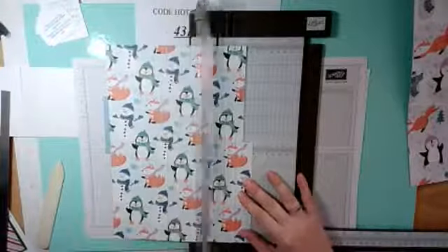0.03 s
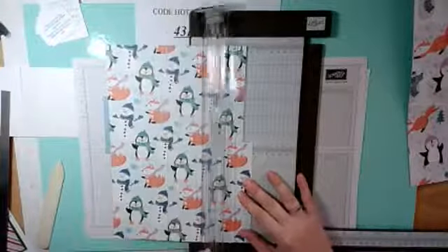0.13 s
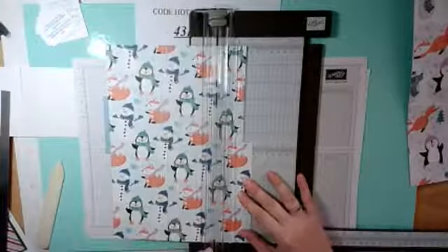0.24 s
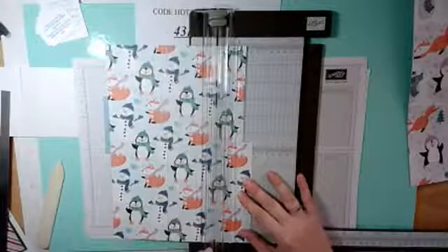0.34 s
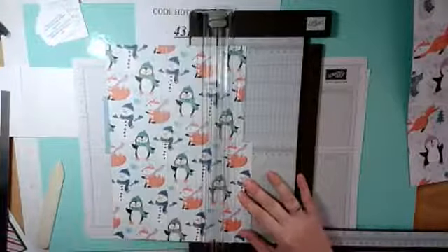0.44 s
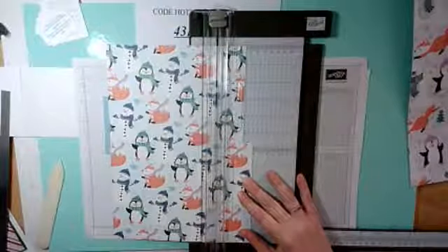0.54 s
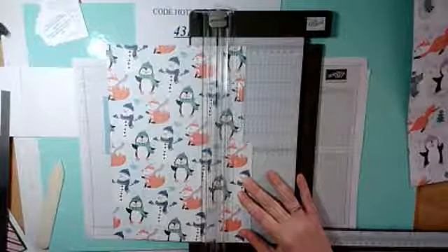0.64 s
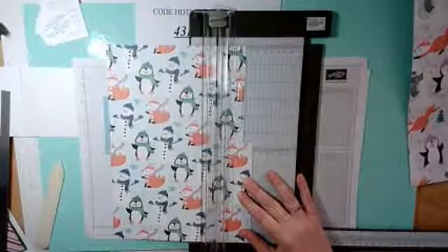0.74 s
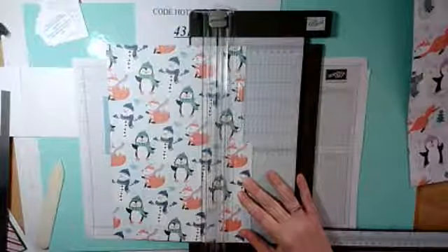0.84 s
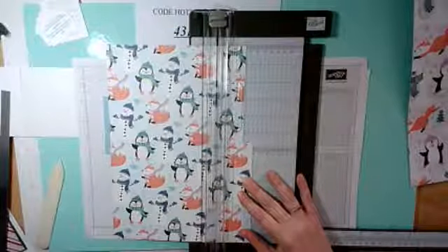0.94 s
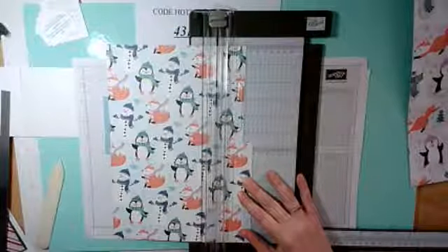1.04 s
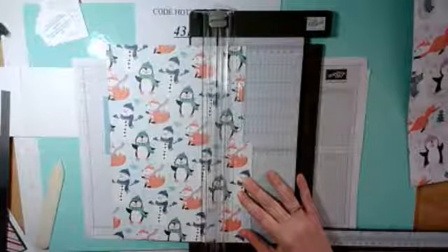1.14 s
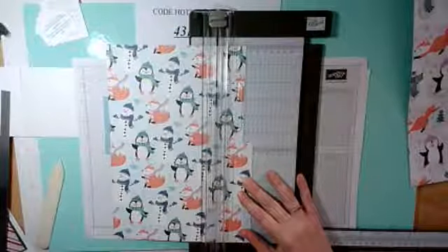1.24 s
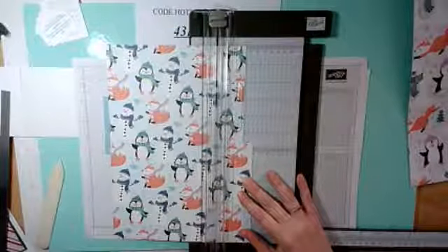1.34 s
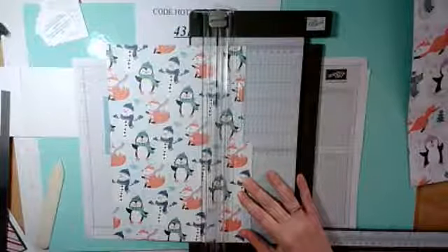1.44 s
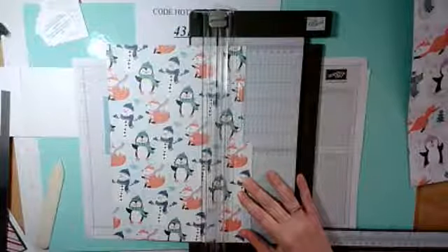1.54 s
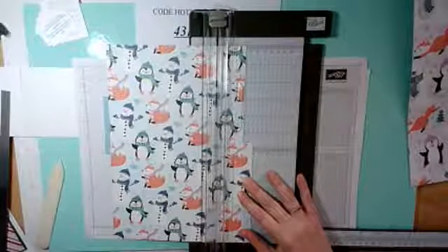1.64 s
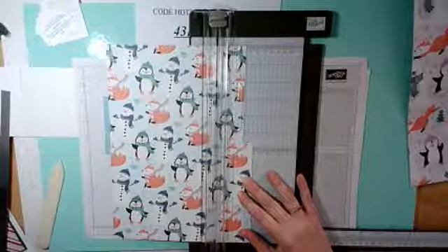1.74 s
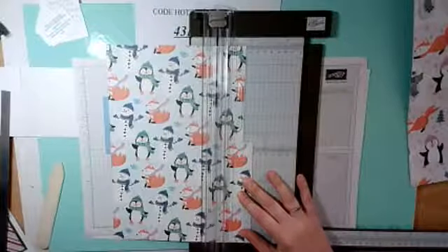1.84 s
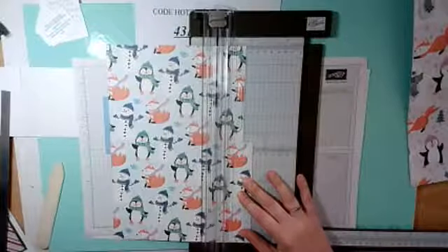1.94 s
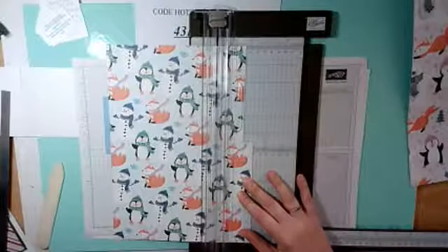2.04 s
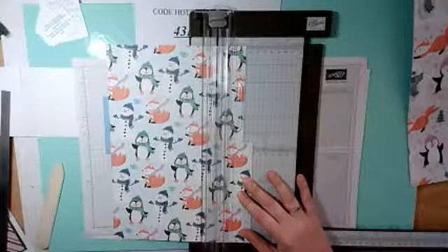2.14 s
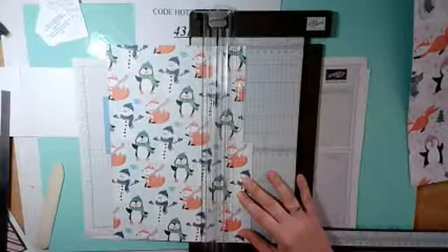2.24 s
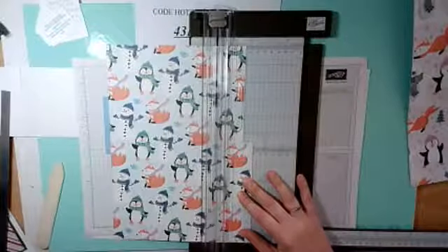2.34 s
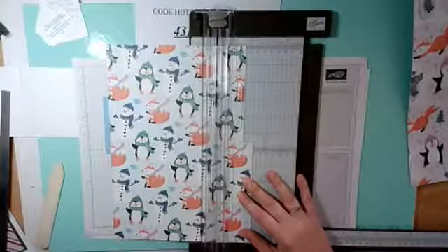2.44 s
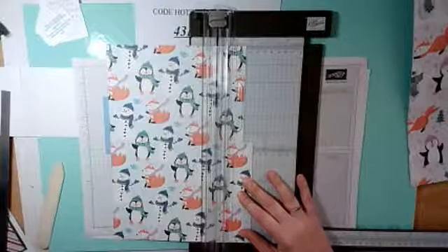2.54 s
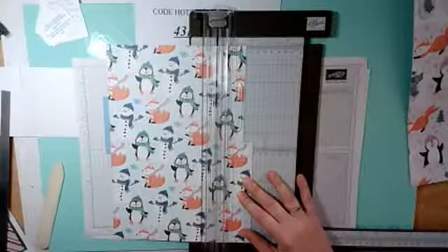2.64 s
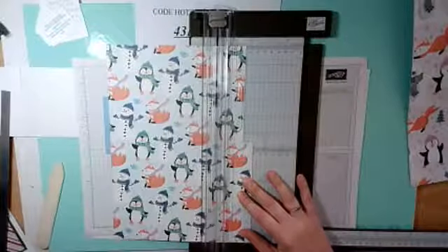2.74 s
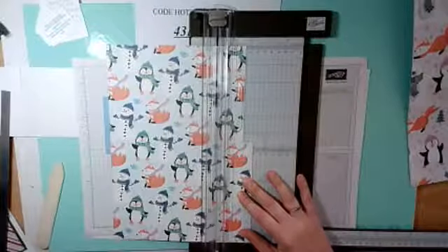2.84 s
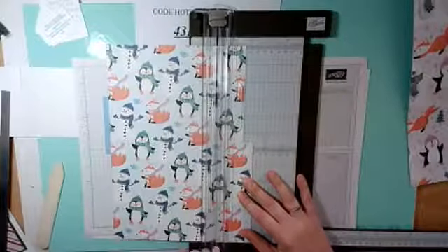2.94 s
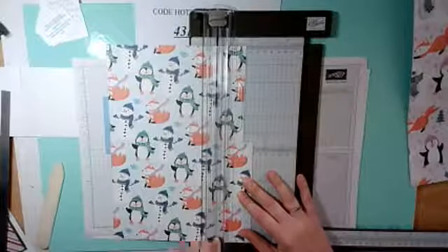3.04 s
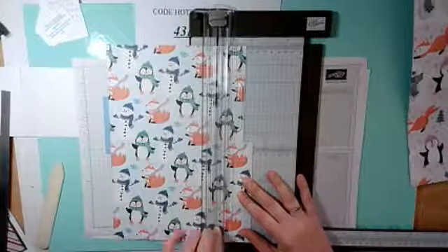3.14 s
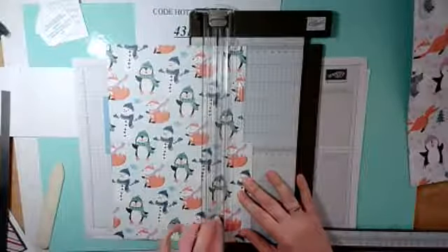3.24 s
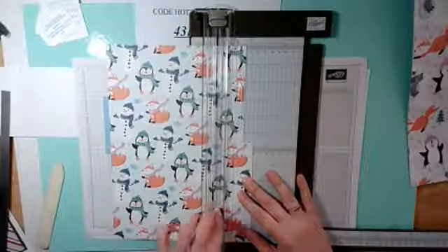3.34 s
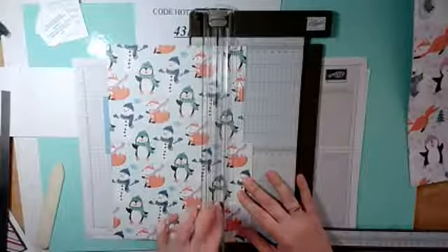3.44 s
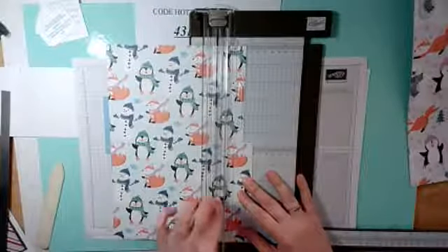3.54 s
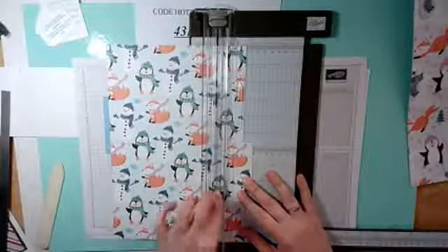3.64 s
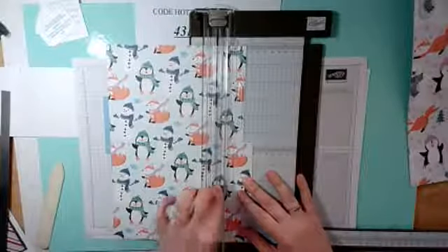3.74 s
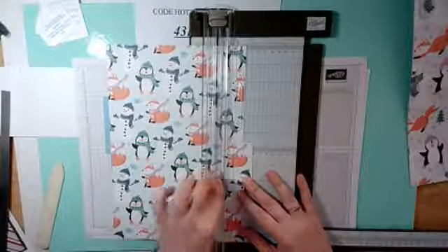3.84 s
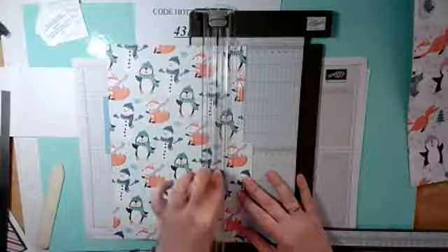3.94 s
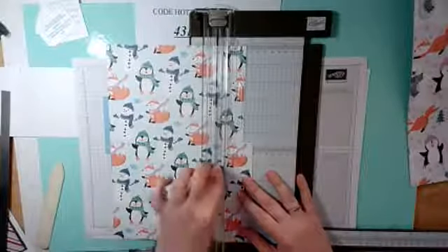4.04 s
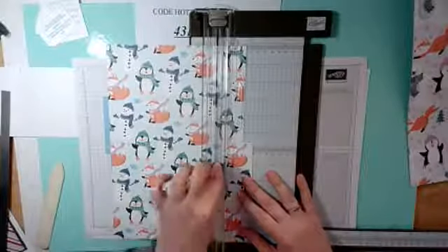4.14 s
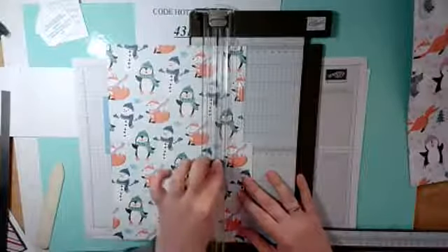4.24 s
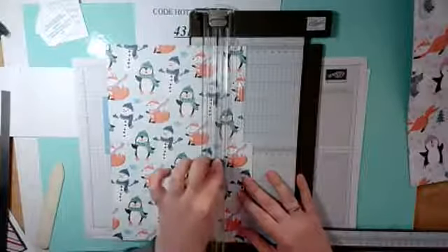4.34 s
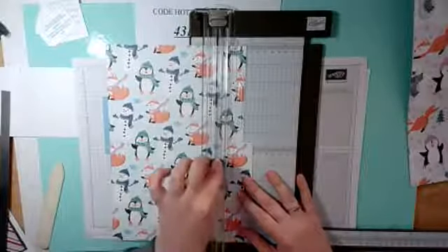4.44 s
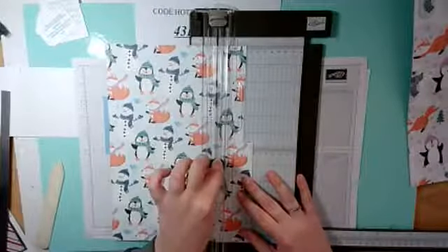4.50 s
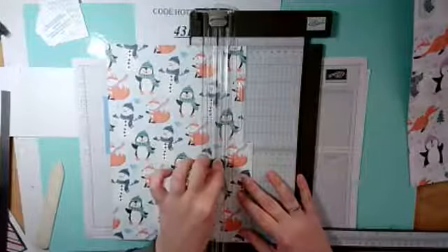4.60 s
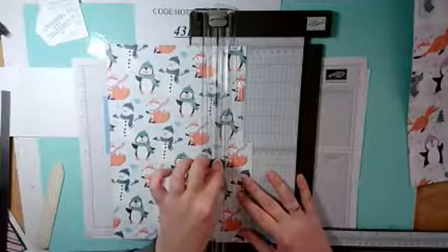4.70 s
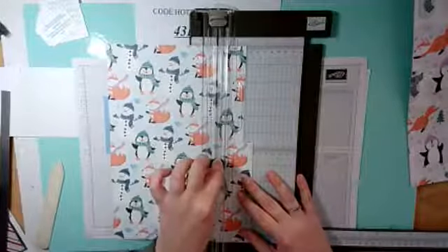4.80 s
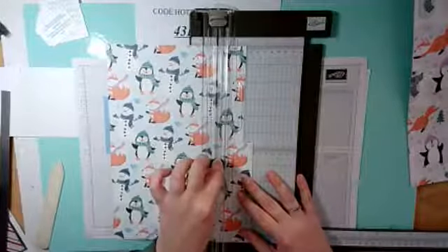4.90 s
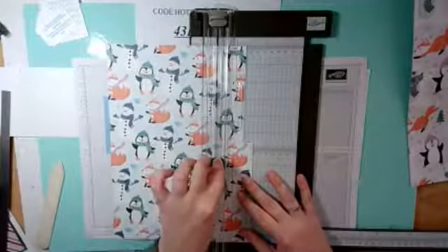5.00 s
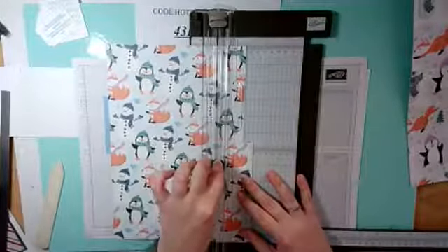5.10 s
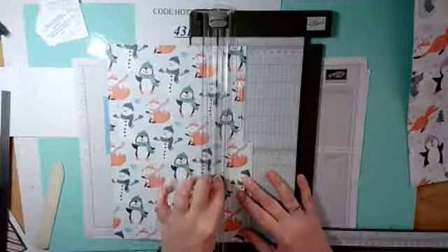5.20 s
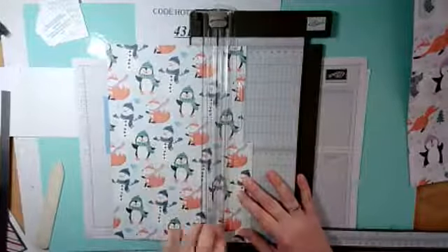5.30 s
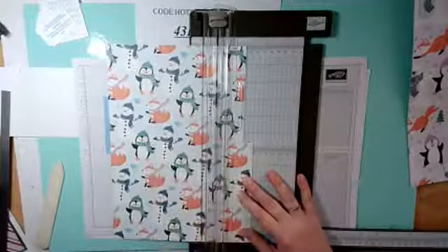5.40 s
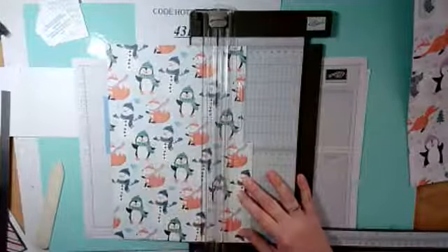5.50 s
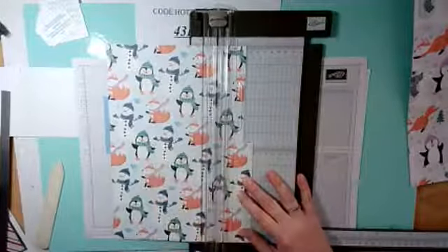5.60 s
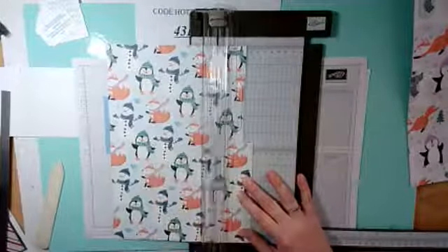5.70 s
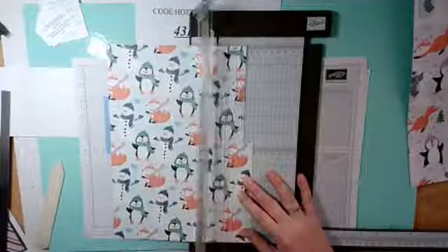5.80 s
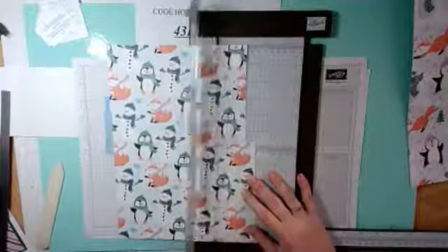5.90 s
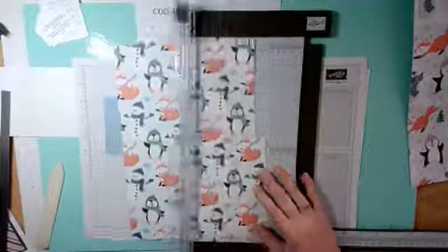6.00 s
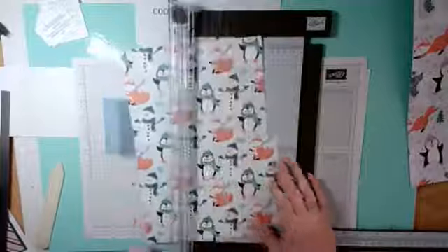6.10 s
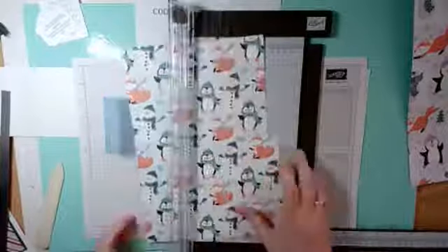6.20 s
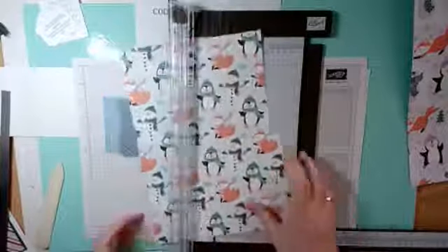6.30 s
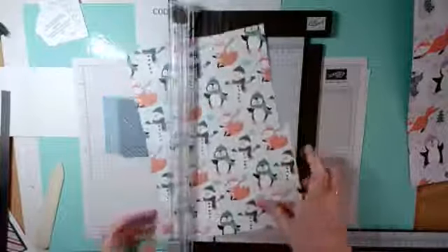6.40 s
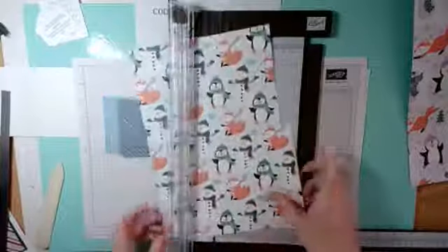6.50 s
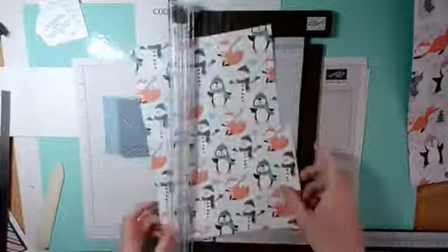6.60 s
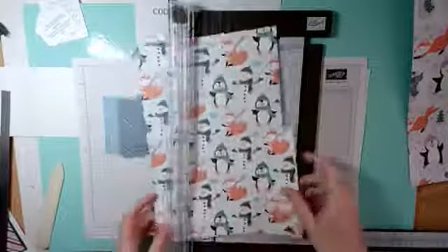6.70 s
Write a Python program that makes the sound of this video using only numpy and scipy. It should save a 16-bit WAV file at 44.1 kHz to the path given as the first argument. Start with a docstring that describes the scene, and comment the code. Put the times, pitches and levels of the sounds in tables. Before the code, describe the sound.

A hollow plastic rail clacks shut, a blade rasps briefly through paper, then the rail unlatches with a sharp snap and the sheet rustles away.

```python
"""Indoors at a craft table: a plastic paper trimmer, close under a small stereo microphone.
Its clear rail is dropped shut, the blade head rasps through the sheet, the rail is unlatched and lifted,
the paper slides away. Contacts are decaying modes and noise with a hollow ring around 1.5 kHz; cut and
strokes are random slips driving resonances. Under them lie shaped noise for room and microphone hiss,
and a deep swelling sine, like an engine outside."""
import sys
import numpy as np
from scipy import signal
from scipy.fft import rfft, irfft, next_fast_len
from scipy.io import wavfile

SR = 44100
rng = np.random.default_rng(int(sys.argv[2]) if len(sys.argv) > 2 else 0)


def to_wav(sig):
    """Store sig (one row per channel, or 1-D mono) as 16-bit WAV at the path in sys.argv[1].

    Samples outside -1..1 are clipped; the rate is SR.
    """
    pcm = np.clip(np.atleast_2d(sig), -1, 1) * 32767
    pcm = np.round(pcm).astype(np.int16)
    wavfile.write(sys.argv[1], SR, pcm.T)  # frames by channels


N = 297818
TIME = np.arange(N) / SR   # s

# Room rumble and hiss under the take; spectra: (frequency [Hz], relative density [dB per Hz])
RUMBLE_SPECTRUM = [(13, -52), (22, -3.5), (46, -4), (63, -9), (75, -13), (118, -13.5), (194, -20),
                   (237, -19), (278, -25), (319, -22), (352, -26), (389, -24.5), (1130, -33), (1520, -45),
                   (2500, -44), (3250, -74), (5500, -120)]
MIC_HISS_SPECTRUM = [(500, 1.5), (2000, 3), (4000, 1.5), (7000, -0.5), (8000, -5.5), (9000, -3), (10200, 1),
                     (11800, -4), (12500, 5), (16000, 1)]
TOP_HISS_SPECTRUM = [(9000, -41), (11600, -11), (12200, -4), (14000, -3), (16000, -7.5)]
# Left-right likeness of the rumble: (frequency [Hz], likeness [-1 to 1])
RUMBLE_LIKENESS = [(30, 0.88), (90, 0.78), (200, 0.6), (600, 0.3), (1000, 0.61), (1450, .85), (2000, 0.46),
                   (3000, -0.28)]
# Swells of the highest hiss: (time [s], length [s], level [dB])
TOP_HISS_SWELLS = [(0.074, 0.26, -54.5), (0.846, 0.1, -55.5), (1.505, 0.18, -56), (2.718, 0.32, -56),
                   (4.477, 0.078, -55.5)]
# Deep drone, before a slight trim: (time [s], level [dB])
DRONE_LEVEL = [(0.1, -74), (0.23, -46.5), (0.43, -55), (0.74, -44), (0.93, -54), (1.44, -51), (1.53, -61),
               (1.7, -59), (3.87, -50), (4.09, -43.5), (4.53, -42), (4.73, -33.5), (6.0, -35.5),
               (6.7, -43.5)]

# Plastic contacts of rail and blade head; thud and crack are trimmed later:
# (time [s], ring peak [dB], ring frequency [Hz], thud level [dB], thud centre [Hz], crack level [dB])
KNOCKS = [(0.093, -37, 1500, -57, 1040, -56), (0.098, -42, 1520, -59, 1040, -56),
          (0.214, -15, 1480, -36, 700, -41), (0.2172, -23, 1240, -40, 1150, -45),
          (0.225, -21.5, 1500, -38, 480, -41), (0.4444, -29, 1520, -29.5, 640, -28),
          (0.4478, -7, 1460, -29, 640, -31), (0.4519, -12.5, 1440, -32, 900, -24.5),
          (0.457, -20, 1680, -34, 900, -38), (0.4612, -9.5, 1400, -24.5, 635, -29),
          (0.4636, -16, 1440, -37, 630, -38), (0.4695, -14, 1720, -34, 500, -34),
          (0.483, -24, 1570, -37, 400, -45), (0.486, -27, 1380, -45, 400, -48),
          (2.773, -41, 1480, -59, 600, -60), (2.806, -39, 1480, -43.5, 480, -52),
          (2.811, -34, 1500, -55, 700, -57), (3.0984, -27, 1430, -48, 480, -50),
          (3.1032, -25.5, 1400, -51, 1100, -51), (3.154, -32, 1420, -60, 700, -54),
          (3.721, -46, 1460, -54, 700, -59), (3.953, -47, 1600, -63, 700, -56),
          (4.021, -39, 1630, -72, 700, -58), (4.226, -38, 1730, -65, 700, -48),
          (4.296, -41, 1470, -65, 700, -51), (4.865, -47, 1420, -59, 700, -69),
          (5.154, -37, 1450, -38, 480, -60), (5.161, -17.5, 1366, -34, 484, -41),
          (5.4472, -8.5, 1645, -38, 695, -22.5), (5.4499, -14, 1470, -40.5, 596, -41),
          (5.628, -41, 1440, -42, 900, -60), (5.6367, -32, 1460, -33.5, 500, -47),
          (5.642, -25.5, 1530, -41, 700, -58), (5.69, -32, 1440, -40.5, 700, -73),
          (5.703, -35, 1500, -45, 700, -68), (5.7112, -26, 1490, -42, 520, -62),
          (5.717, -32, 1400, -42, 900, -66), (5.758, -25, 1490, -42.5, 630, -42),
          (5.761, -19.5, 1530, -40, 630, -45), (5.771, -25, 1480, -47, 1000, -56),
          (5.7773, -19, 1500, -39.5, 900, -39.5), (5.782, -25, 1480, -44, 600, -41),
          (5.791, -24, 1320, -44, 1100, -44), (5.814, -32, 1510, -48, 400, -58),
          (5.949, -36, 1520, -65, 700, -49), (5.965, -34, 1550, -62, 700, -44),
          (6.094, -31, 1540, -70, 700, -38), (6.159, -50, 1510, -69, 700, -62),
          (6.253, -52, 1500, -47, 750, -53), (6.331, -35, 1800, -46, 900, -58),
          (6.34, -44, 1300, -43, 800, -57), (6.356, -52, 1400, -48, 950, -53),
          (6.378, -38, 1780, -53, 900, -61), (6.435, -31, 1400, -40, 610, -43),
          (6.519, -40, 1520, -65, 700, -60), (6.592, -54, 1300, -51.5, 620, -58),
          (6.628, -37.5, 1600, -56, 700, -55), (6.641, -42, 1560, -59, 700, -56),
          (6.698, -42, 1920, -69, 1100, -48)]
# Modes of the trimmer's bed: (frequency [Hz], relative level [dB], t60 [s])
BED_MODES = [(211, -8, 0.1), (363, -8.5, 0.073), (429, -8, 0.031), (515, -1, 0.048), (620, -1.5, 0.039),
             (726, -8.5, 0.057), (792, -6.5, 0.064), (900, -6.5, 0.057), (1048, -2, 0.059),
             (1203, 1.5, 0.041)]
# Bright crack of a contact: (frequency [Hz], relative density [dB per Hz])
CRACK_SPECTRUM = [(900, -8), (2200, 3), (2900, -2.5), (3900, 1), (5000, -5), (7200, -0.5), (8500, -13.5),
                  (11000, -3.5), (13000, 0), (16000, 1)]
# Left-right likeness of the crack: (frequency [Hz], likeness [-1 to 1])
CRACK_LIKENESS = [(2000, -0.11), (7000, 0.0075), (12000, -0.11), (15500, -0.34)]
# Heavy blows that reach the table top: (time [s], level of the lower tone [dB], its frequency [Hz])
THUMPS = [(.214, -41, 115), (.228, -47, 206), (.239, -45, 310), (.447, -24.5, 94.6), (.466, -32.5, 90),
          (2.81, -48, 417), (2.818, -45.5, 199), (5.162, -55, 300), (5.448, -34, 187), (5.714, -34, 66),
          (6.435, -43, 167)]

# Rubbing on plastic and paper; spectra: (frequency [Hz], relative density [dB per Hz])
SCRAPE_SPECTRUM = [(100, -13), (210, 4.5), (300, -3.5), (520, 1), (800, -1.5), (1100, 1.5), (1600, -16),
                   (2050, 0.5), (2350, -9.5), (2700, -15), (4000, -15.5)]
RUB_HISS_SPECTRUM = [(1500, -5.5), (2500, -5), (4500, -13), (7000, -6.5), (8800, -7.5), (10300, -6),
                     (11700, -4), (12300, 6.5), (14000, 7), (16000, -5)]
# Left-right likeness of the rubbing: (frequency [Hz], likeness [clipped to -1 to 1])
RUB_LIKENESS = [(200, 0.69), (1400, 1), (2100, 0.12), (4000, 0.087), (7000, 1), (8500, -2.9),
                (10000, -0.0027), (13000, 0.58), (14500, 0.12), (15500, 0.57)]
# Single fibres snap, each at its own pitch: (frequency [Hz], relative level [dB])
SNAP_PITCHES = [(520, -3), (680, -3.5), (850, 0.5), (1080, -2), (1300, 6), (1550, 0), (1850, -1),
                (2150, -11)]
# Speed of the blade head, given as the level of its hiss: (time [s], level [dB])
HEAD_SPEED = [(3.12, -45), (3.232, -43.5), (3.496, -48.5), (3.612, -47.5), (3.62, -49.5), (3.916, -48),
              (4.2, -58), (4.218, -51.5), (4.36, -66.5)]
# The rail's ring shifts as the head travels along it: (time [s], frequency [Hz])
RAIL_RING = [(3.1, 1410), (3.28, 1500), (3.42, 1580), (3.56, 1590), (3.63, 1400), (3.86, 1440),
             (4.04, 1620), (4.3, 1460)]
# The blade drags harder: (time [s], length [s], level [dB], rasp frequency [Hz])
DRAGS = [(3.217, .012, -58, 700), (3.275, .025, -51, 900), (3.428, .02, -55, 2080),
         (3.487, .035, -53, 2110), (3.572, 0.017, -51, 730), (3.605, .015, -56, 2060),
         (3.815, 0.1, -60, 2060)]
# High rasps reach the right side with opposite sign: (frequency [Hz], right over left [ratio])
DRAG_RIGHT_OVER_LEFT = [(1400, 0.83), (2000, -0.41)]
# Strokes of fingers and sheet on the bed; scrape is trimmed later:
# (time [s], length [s], ring level [dB], scrape level [dB], hiss level [dB], ring frequency [Hz])
STROKES = [(4.991, 0.017, -56.5, -50.5, -55.5, 1330), (5.208, 0.18, -53, -58, -59, 1480),
           (5.523, 0.29, -63, -57.5, -59, 1500), (5.825, 0.034, -50, -60, -72, 1540),
           (5.935, 0.1, -47, -57.5, -53, 1630), (6.071, 0.018, -44, -53, -52, 1500),
           (6.103, .012, -44.5, -54, -50.5, 1780), (6.254, 0.017, -61, -57, -55.5, 1290),
           (6.326, 0.028, -51, -58.5, -50, 1600), (6.39, 0.04, -57, -48.5, -54, 1430),
           (6.468, 0.043, -52.5, -54, -60, 1130), (6.574, .15, -59, -60.5, -58, 1530)]
# The latch springs open: (frequency [Hz], relative level [dB], t60 [s])
LATCH_MODES = [(7430, -2.5, 0.017), (8640, -5, 0.017), (10100, -9, 0.056), (11200, -4.5, 0.029),
               (13900, 0, 0.031)]


def from_db(db):
    """Decibels to gain."""
    return 10 ** (np.asarray(db) / 20)


def rms_one(x):
    """Scale to unit power."""
    return x / np.sqrt(np.mean(x ** 2) + 1e-20)


def in_time(rows):
    """Each column of a curve at every sample."""
    s, *columns = np.transpose(rows)
    return [np.interp(TIME, s, column) for column in columns]


def at_hz(points, hz):
    """Read a curve on a log-frequency axis."""
    f, value = np.transpose(points)
    return np.interp(np.log(hz + 1e-6), np.log(f), value)


def envelope(s, length_s, attack_s, release_s):
    """Rise until time s, hold for the length, then decay with time constant release_s."""
    rise = np.clip(1 + (TIME - s) / attack_s, 0, 1)
    return rise * np.exp(-np.maximum(TIME - s - length_s, 0) / release_s)


def fade(t, t60):
    """Exponential decay by 60 dB in t60 seconds."""
    return np.exp(-np.log(1000) * t / t60)


def add(out, s, sound):
    """Mix a short sound in at time s."""
    start = int(s * SR)
    out[:, start:start + sound.shape[-1]] += sound[..., :N - start]


def drift(rate):
    """Random wandering of spread 1, with rate new targets per second."""
    knots = rng.standard_normal(4000)
    return rms_one(np.interp(TIME * rate, np.arange(len(knots)), knots))


def coloured(pair, spectrum, likeness):
    """Two unrelated signals become left and right with a given spectrum and likeness; rms 1."""
    length = pair.shape[1]
    size = next_fast_len(length)
    hz = np.fft.rfftfreq(size, 1 / SR)
    mid, side = rfft(pair, size) * from_db(at_hz(spectrum, hz))
    alike = np.clip(at_hz(likeness, hz), -1, 1)
    stereo = np.sqrt(1 + alike) * mid + np.sqrt(1 - alike) * side * [[1], [-1]]
    return rms_one(irfft(stereo, size)[:, :length])


def resonate(x, hz, width_hz):
    """A resonance whose centre may move: shift it to zero, low-pass, shift back."""
    turn = np.exp(2j * np.pi * np.cumsum(hz * np.ones(len(x))) / SR)
    r = np.exp(-np.pi * width_hz / SR)
    return 2 * np.real(turn * signal.lfilter([1 - r], [1, -r], x / turn))


def soften(x, top_hz):
    """Yielding plastic passes little above a limit."""
    return signal.sosfilt(signal.butter(4, top_hz, fs=SR, output="sos"), x)


def hollow(force, hz, width_hz, skirt_hz, sway_hz=2100, sway_width_hz=280, sway_db=-9):
    """The hollow ring: one mode in step on both sides, and a weaker, higher one of opposite sign."""
    force = resonate(force, 1376, skirt_hz)
    main = resonate(force, hz, width_hz) * from_db([[.85], [-.85]])
    sway = from_db(sway_db) * resonate(force, sway_hz, sway_width_hz) * np.array([[-1], [1]])
    return soften(main + sway, top_hz=2150)


def background(rumble_db=-51.5, hiss_db=-59.0, ring_db=-68, top_db=-64, hum_hz=119.5, hum_db=-66):
    """Noise shaped as rumble, hollow ring, microphone hiss and a swelling top, plus a faint hum."""
    rumble = coloured(rng.standard_normal((2, N)), RUMBLE_SPECTRUM, RUMBLE_LIKENESS)
    ring = rms_one(hollow(rng.standard_normal(N), 1500, width_hz=260, skirt_hz=800))
    hiss = coloured(rng.standard_normal((2, N)), MIC_HISS_SPECTRUM, [(2000, -0.2), (14000, -0.18)])
    swells = sum(from_db(db) * envelope(s, length_s, attack_s=0.049, release_s=0.023)
                 for s, length_s, db in TOP_HISS_SWELLS)
    top = coloured(rng.standard_normal((2, N)), TOP_HISS_SPECTRUM, [(12000, 0), (16000, -.1)])
    top *= np.hypot(from_db(top_db), swells)
    hum = from_db(hum_db) * np.sqrt(2) * np.sin(2 * np.pi * hum_hz * TIME)
    return from_db(rumble_db) * rumble + from_db(ring_db) * ring + hum + from_db(hiss_db) * hiss + top


def drone(start_hz=45.2, wander_hz=3.48, settles_s=3.41, climb_s=3.9, climb_hz_per_s=1.45, trim_db=-0.15):
    """A deep sine of changing level: its pitch wanders, settles, then creeps upward."""
    level_db, = in_time(DRONE_LEVEL)
    wander = wander_hz * drift(5) * np.clip(settles_s - TIME, 0, 1)
    hz = start_hz + wander + climb_hz_per_s * np.maximum(TIME - climb_s, 0)
    return from_db(level_db + trim_db) * np.sqrt(2) * np.sin(2 * np.pi * np.cumsum(hz) / SR)


def bed_thud(t, centre_hz, focus_db_per_octave=6.5):
    """A blow excites mostly the bed's modes near its centre, with random strengths and signs."""
    octaves_off = np.abs(np.log2(np.array(BED_MODES)[:, 0] / centre_hz))
    luck_db = rng.normal(0, 2.5, len(BED_MODES))
    shares = from_db(luck_db - focus_db_per_octave * octaves_off) * rng.choice([-1, 1], len(BED_MODES))
    modes = sum(share * from_db(db) * np.sin(2 * np.pi * hz * t) * fade(t, t60)
                for share, (hz, db, t60) in zip(shares, BED_MODES))
    return soften(modes, top_hz=1500)


def afterglow(t, db=-32, t60=0.51):
    """The hollow ring scatters round the room and dies away as a band of noise."""
    glow = hollow(rng.standard_normal(len(t)), 1490, width_hz=240, skirt_hz=620, sway_db=-4)
    return from_db(db) * rms_one(glow) * fade(t, t60)


def contact(ring_db, ring_hz, thud_db, thud_hz, crack_db):
    """One contact gives a hollow ring, a thud of the bed, a chatter of the loose rail and a bright crack."""
    t = np.arange(SR * 2 // 5) / SR
    first = slice(SR // 100)   # thud and chatter are levelled over their first 10 ms
    ring = hollow(1. * (t == 0), ring_hz, width_hz=124, skirt_hz=570)
    ring *= from_db(ring_db) / np.abs(ring).max()
    thud = bed_thud(t, thud_hz)
    thud *= from_db(thud_db - 3) / np.std(thud[first])
    # the more the bed is shaken, the more the rail chatters against it
    chatter = hollow(rng.standard_normal(len(t)) * fade(t, 0.099), 1430, width_hz=450, skirt_hz=1400)
    chatter *= from_db(thud_db - 6) / np.std(chatter[:, first])
    # the crack rises within about 1 ms and leaves a faint, longer rattle
    crack = coloured(rng.standard_normal((2, len(t))), CRACK_SPECTRUM, CRACK_LIKENESS)
    crack *= from_db(crack_db - 3) * (fade(t, 0.045) + from_db(-21) * fade(t, 0.35))
    crack *= 1 - np.exp(-t / 0.001)
    return ring + from_db(ring_db) * afterglow(t) + thud + chatter + crack


def knocks():
    """Rail and blade head strike the bed, singly or in quick rattles."""
    out = np.zeros((2, N))
    for s, *blow in KNOCKS:
        add(out, s, contact(*blow))
    return out


def room(x, t60=0.3, wet_db=-15.0, delay_s=0.0072):
    """A small furnished room: a delayed, decaying noise tail, the same on both sides."""
    t = np.arange(SR * 3 // 4) / SR
    colour = [(200, 9), (400, 8), (900, -2.0), (1180, -8), (1500, -13),
              (1800, -14), (2200, 9.0), (3000, 8.0), (6000, -4.0)]
    tail = coloured(rng.standard_normal((2, len(t))), colour, [(200, 1.0), (2500, 1.0)])
    tail *= fade(t, t60) * (t > delay_s)
    tail *= from_db(wet_db) / np.sqrt(np.sum(tail ** 2) / 2)
    return signal.fftconvolve(x, tail, axes=1)[:, :N]


def table_top(t60=0.067, overtone_ratio=1.67, overtone_db=-7):
    """The heavier blows set the table booming briefly: a decaying tone with one overtone."""
    out, t = np.zeros((2, N)), np.arange(SR // 3) / SR
    for s, db, hz in THUMPS:
        overtone = from_db(overtone_db) * np.sin(2 * np.pi * overtone_ratio * hz * t)
        boom = np.sin(2 * np.pi * hz * t) + overtone
        add(out, s, from_db(db) * boom * fade(t, t60))
    return out


def grains(per_s, spread_db):
    """Two random streams of tiny slips of uneven size; rms 1."""
    luck = rng.laplace(size=(2, N))
    slips = rng.random((2, N)) < per_s / SR
    size_db = spread_db * np.minimum(np.abs(luck[slips]), 4)
    out = np.zeros((2, N))
    out[slips] = np.sign(luck[slips]) * from_db(size_db)
    return rms_one(out)


def snaps(per_s, spread_db=3.0, sharpness=9.6):
    """Sparse crackle: every snap rings for a few cycles at one of the sheet's pitches; rms 1."""
    clicks = grains(per_s, spread_db)[0]
    dealt = rng.integers(0, len(SNAP_PITCHES), N)   # which pitch a snap gets
    rings = np.zeros(N)
    for k, (hz, db) in enumerate(SNAP_PITCHES):
        b, a = signal.iirpeak(hz, sharpness, fs=SR)
        rings += from_db(db) * rms_one(signal.lfilter(b, a, clicks * (dealt == k) + 1e-18))
    return rms_one(soften(rings, top_hz=2280))


def rubbing(ring_db, scrape_db, hiss_db, ring_hz, per_s, grain_db, judder_db,
            flex_hz, flex_width_hz, flex_db, snaps_per_s, snap_db):
    """Fibres catch and let go: dense slips in uneven bunches drive ring, bed, sheet and a fine hiss."""
    judder = from_db(judder_db * drift(130))
    on_rail, on_sheet = grains(per_s, grain_db) * judder
    ring = rms_one(hollow(on_rail, ring_hz, width_hz=230, skirt_hz=730))
    scrape = coloured(grains(per_s, grain_db) * judder, SCRAPE_SPECTRUM, RUB_LIKENESS)
    # the sheet's own resonance wanders as the point of contact moves
    moving_hz = flex_hz * from_db(2.17 * drift(16))
    flex = rms_one(soften(resonate(on_sheet, moving_hz, flex_width_hz), top_hz=1500))
    hiss = coloured(grains(16000, 3.4) * np.sqrt(judder), RUB_HISS_SPECTRUM, RUB_LIKENESS)
    hiss *= from_db([[-1.8], [1.5]])   # stronger on the right
    rasp = scrape + from_db(flex_db) * flex + from_db(snap_db) * snaps(snaps_per_s)
    return from_db(ring_db) * ring + from_db(scrape_db - 3.5) * rasp + from_db(hiss_db) * hiss


def catches(per_s=18, decay_s=0.006):
    """Now and then the blade catches on a fibre and jumps free: decaying jolts of height 1."""
    starts = 1. * (rng.random(N) < per_s / SR)
    return np.minimum(signal.lfilter([1], [1, -np.exp(-1 / (decay_s * SR))], starts + 1e-18), 1)


CUT_START_S = 3.1


def blade(cruise_db=-47.5):
    """The blade bites at once and comes to rest; ring, scrape and hiss all follow its speed."""
    speed_db = in_time(HEAD_SPEED)[0] - cruise_db
    # the hand pushes unevenly, and the ring wanders with random drift
    surge_db = 1.4 * drift(35) + 2.8 * catches()
    ring_db = -51 + 0.67 * speed_db + surge_db
    scrape_db = -50.5 + 0.69 * speed_db + .5 * surge_db
    hiss_db = -45 + speed_db
    ring_hz = in_time(RAIL_RING)[0] + 52 * drift(12)
    rub = rubbing(ring_db, scrape_db, hiss_db, ring_hz, per_s=650, grain_db=0.5, judder_db=1.25,
                  flex_hz=728, flex_width_hz=90, flex_db=-9.5, snaps_per_s=120, snap_db=-3.5)
    return envelope(CUT_START_S, length_s=1.22, attack_s=0.0022, release_s=0.039) * rub


def squeal(peak_s=3.33, peak_db=-39, grow_db_per_s=18, fade_db_per_s=108, start_hz=1352, rise_hz_per_s=610):
    """Uneven slips of the blade drive one rising, wobbling resonance: a rough near-squeal in the first push."""
    past_peak = TIME - peak_s
    level_db = peak_db + np.minimum(grow_db_per_s * past_peak, -fade_db_per_s * past_peak)
    level_db += 2.5 * drift(110)   # judder
    hz = start_hz + rise_hz_per_s * np.clip(TIME - CUT_START_S, 0, .5) + 26 * drift(45)
    slips = grains(per_s=800, spread_db=0.0)[0]
    tone = rms_one(resonate(resonate(slips, hz, width_hz=95), hz, width_hz=380))
    return (TIME > CUT_START_S) * from_db(level_db) * tone


def drags(width_hz=260):
    """Short rasping surges on top of the cut: slips filtered to a band at the rasp's pitch."""
    out = np.zeros((2, N))
    slips = grains(per_s=700, spread_db=-0.5)[0]
    for s, length_s, db, hz in DRAGS:
        edges_hz = [hz - width_hz / 2, hz + width_hz / 2]
        band = signal.butter(2, edges_hz, "band", fs=SR, output="sos")
        rasp = rms_one(signal.sosfilt(band, slips + 1e-18))
        sides = np.array([[1], [at_hz(DRAG_RIGHT_OVER_LEFT, hz)]])
        out += from_db(db) * envelope(s, length_s, attack_s=.015, release_s=0.013) * rasp * sides
    return out


def sheet():
    """Fingers brush the rail and the cut sheet is pushed across the bed, stroke by stroke."""
    s, length_s, *levels_db, hz = np.transpose(STROKES)
    shapes = np.array([envelope(start, length, attack_s=0.038, release_s=0.035)
                       for start, length in zip(s, length_s)])
    # overlapping strokes add in power
    power = from_db(levels_db) ** 2 @ shapes ** 2
    ring_db, scrape_db, hiss_db = 10 * np.log10(power + 1e-12)
    ring_hz = np.interp(TIME, s + length_s / 2, hz)
    return rubbing(ring_db, scrape_db, hiss_db, ring_hz, per_s=1900, grain_db=1.5, judder_db=0.3,
                   flex_hz=885, flex_width_hz=120, flex_db=-5.0, snaps_per_s=70, snap_db=-1)


def latch(open_s=5.447, level_db=-26):
    """The stiff catch of the rail pings as it lets go: a few high decaying modes."""
    out, t = np.zeros((2, N)), np.arange(SR // 8) / SR
    for hz, db, t60 in LATCH_MODES:
        add(out, open_s, from_db(level_db + db) * np.sin(2 * np.pi * hz * t) * fade(t, t60))
    return out


def scene():
    """The trimmer in its room, over drone and background."""
    trimmer = knocks() + table_top() + blade() + squeal() + drags() + sheet() + latch()
    return trimmer + room(trimmer) + drone() + background()


def record(dry):
    """The top is cut steeply above 15.9 kHz."""
    return signal.sosfilt(signal.ellip(12, .1, 80, 15900, fs=SR, output="sos"), dry)


dry = scene()
out = record(dry)
to_wav(out)
```